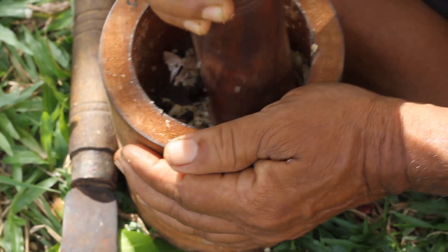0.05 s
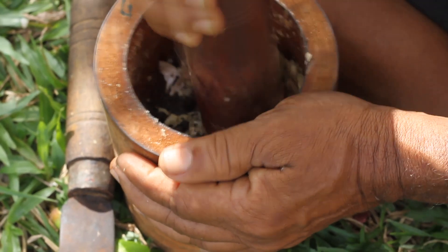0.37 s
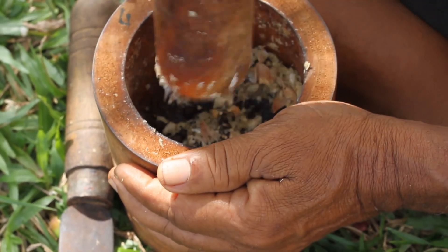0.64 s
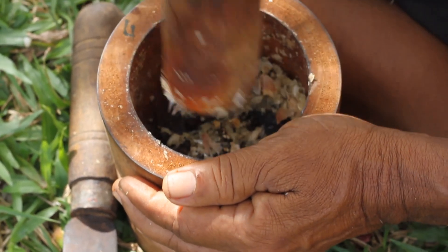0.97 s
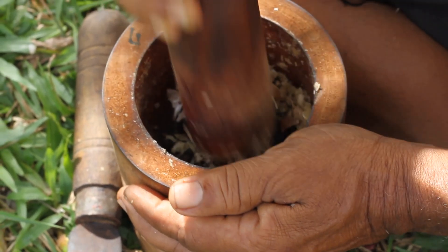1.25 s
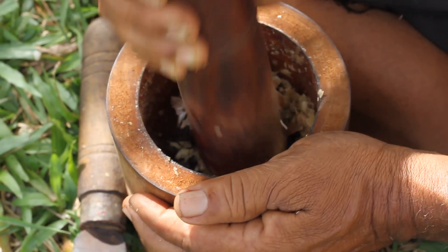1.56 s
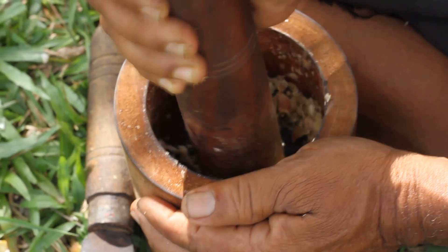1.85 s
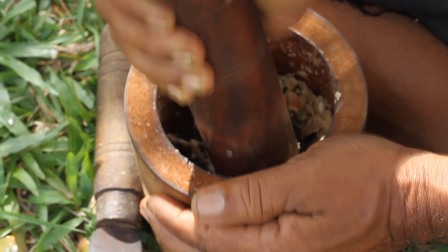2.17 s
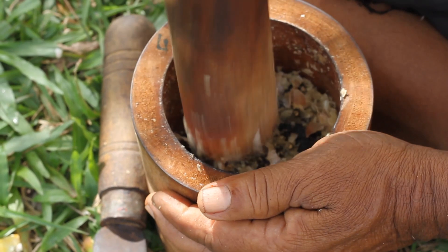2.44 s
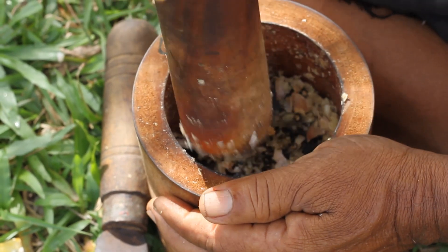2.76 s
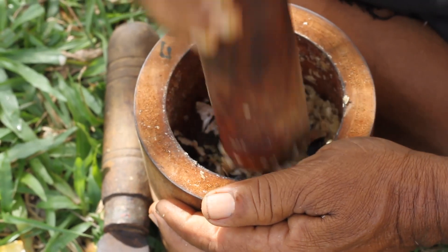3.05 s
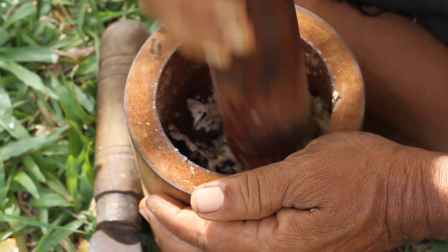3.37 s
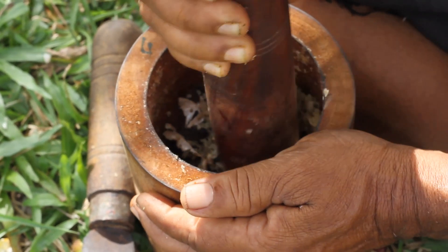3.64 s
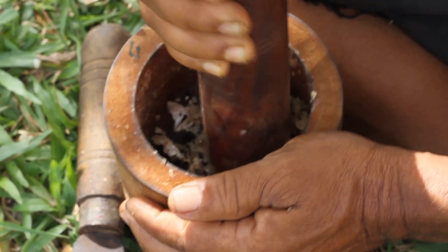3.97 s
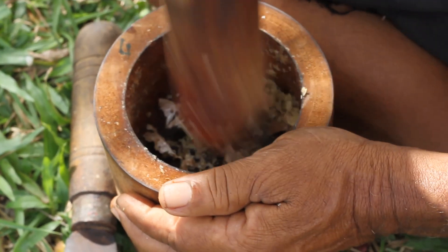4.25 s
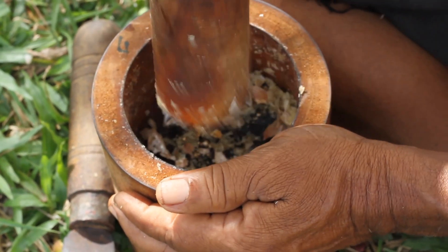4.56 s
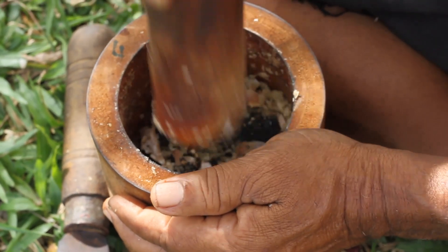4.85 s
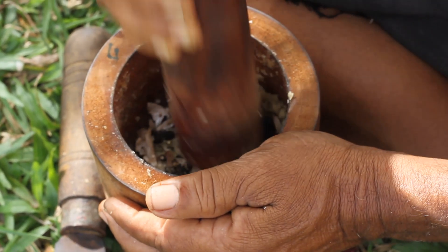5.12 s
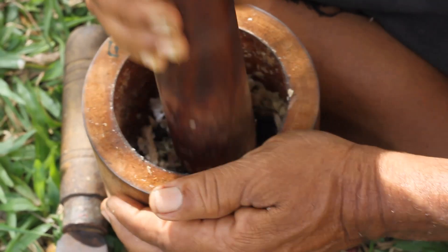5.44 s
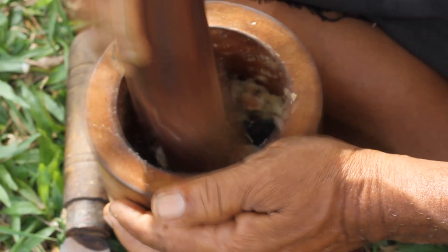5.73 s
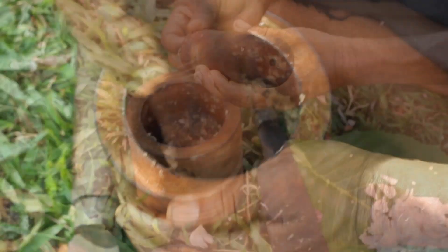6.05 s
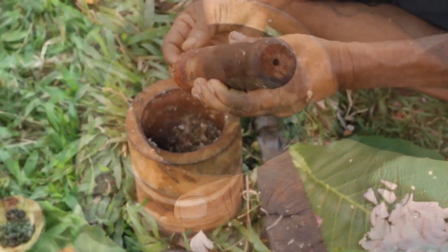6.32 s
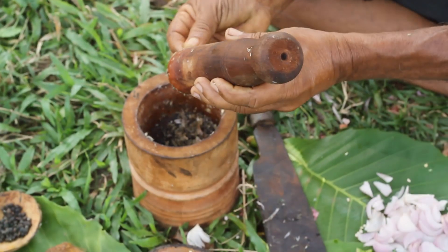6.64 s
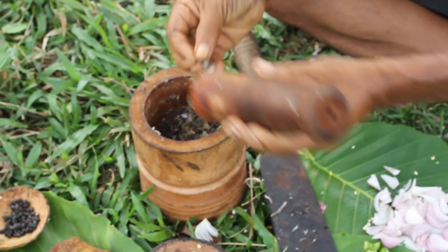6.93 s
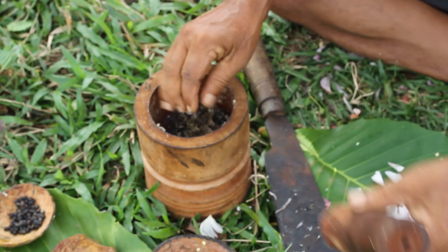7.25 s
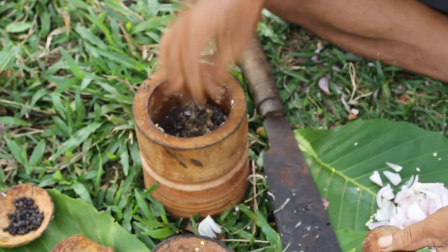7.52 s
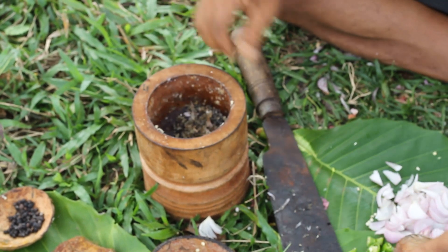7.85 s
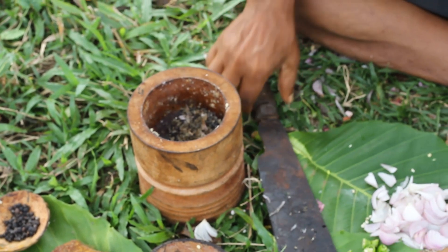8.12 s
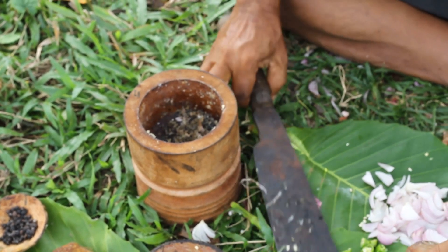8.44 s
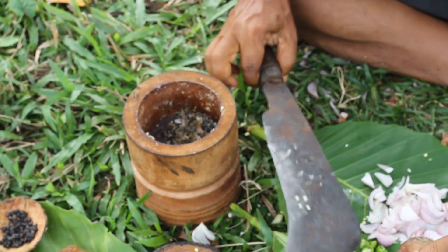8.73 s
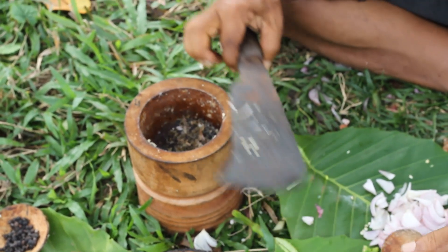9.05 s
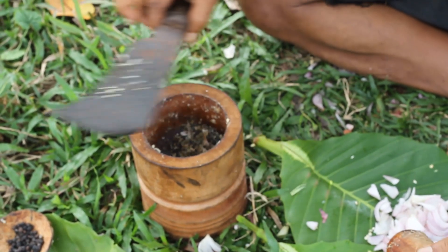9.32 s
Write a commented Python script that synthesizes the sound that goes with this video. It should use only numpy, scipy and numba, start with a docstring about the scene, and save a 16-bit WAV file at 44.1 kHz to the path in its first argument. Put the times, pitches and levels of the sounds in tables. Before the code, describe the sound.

Close, crunchy wooden knocks of a mortar and pestle outdoors fade away into soft wind on the microphone and a few birds.

```python
"""A wooden pestle pounds spices in a wooden mortar on a lawn, while birds call and wind buffets the
microphone. Blows on bare wood ring brightly; blows on the paste land dull and crunch. They overload
the microphone and duck its gain. Near six seconds the pestle clacks against the wall, and the pounding
fades away with a few faint ticks and scrapes, leaving the open air. Last, a distant rush swells."""
import sys
import numpy as np
from scipy import signal
from scipy.fft import rfft, irfft
from scipy.io import wavfile
from numba import njit

SR = 44100
rng = np.random.default_rng(int(sys.argv[2]) if len(sys.argv) > 2 else 0)


def put_to_file(sound):
    """Save the sound as 16-bit audio at rate SR, in the file named by the first command-line argument."""
    columns = np.atleast_2d(sound).T  # one column per channel
    safe = np.clip(columns, -1, 1)
    whole_steps = np.round(safe * 32767)
    wavfile.write(sys.argv[1], SR, whole_steps.astype(np.int16))


N = 418509

# pestle blows, each with a second touch on bare wood, given relative to the first:
# start_s, force_db, contact_ms, bare_db, bare_delay_ms, crunch_db
PESTLE_BLOWS = [(0.0113, 12, 0.24, -26, 0.33, -18), (0.3767, 11.5, 1, -47, 0.9, -7),
                (0.7363, 8.5, 0.17, -13, 0.16, -13), (1.094, 7, 1.02, -26, 0.51, -5.5),
                (1.4383, 5.5, 0.82, -6, 0.35, -19), (1.8158, 10.5, 1.07, -29, 0.33, -16),
                (2.162, 8.5, 0.84, -8.5, 0.34, -23.5), (2.5179, 4.5, 0.63, 7, 0.63, -26),
                (2.8645, 4, 0.61, 0, 0.36, -21.5), (3.2361, 1.5, 1.39, -42, 0.96, -11.5),
                (3.5928, 11.5, 0.13, -34, 0.081, -32), (3.9406, 16, 0.2, -15, 0.42, -38),
                (4.29, 8, 0.18, -20.5, 0.49, -17.5), (4.6451, 15, 0.24, -12.5, 0.5, -13),
                (5.0032, 17.5, 0.2, -9.5, 0.24, -29), (5.3488, 10, 0.99, -35, 0.31, -18.5),
                (5.6987, -2.5, 0.98, -13, 0.28, -17), (6.035, -14, 1.26, -18, 0.5, -28.5),
                (6.396, -15, 0.99, -14.5, 0.58, -42)]
# modes of pestle and mortar together: pitch_hz, level_db, t60_s, first_swing_sign
MORTAR_MODES = [(225, -23, 0.019, 1), (442, 0, 0.0052, -1), (558.6, 2, 0.0075, 1), (802, -8.5, 0.015, 1),
                (1059, -3, 0.015, -1), (1101, -14.5, 0.023, -1), (1489, -7, 0.014, -1),
                (1558.5, -3, 0.026, 1), (2016, -13.5, 0.022, -1), (2225, -12.5, 0.019, -1),
                (2950, -10, 0.011, 1), (3800, -9.5, 0.01, -1), (5144, -10.5, 0.015, 1)]
# the pestle strikes the wall and rebounds: start_s, level_db
WALL_CLACKS = [(5.6995, 3), (5.7092, -15)]
# modes of the wall: pitch_hz, level_db, t60_s
WALL_MODES = [(3870, -6, 0.0093), (5110, -2, 0.0041), (6000, 9.5, 0.0021), (7340, -0.5, 0.003),
              (10170, 1, 0.0024), (14000, -2, 0.0039)]
# spectrum of cracking seeds: frequency_hz, density_db
CRACK_SPECTRUM = [(100, -20), (300, -6), (800, 1), (1400, -6.5), (2400, -6), (4000, -0.5), (6300, 3.5),
                  (11000, -12), (16000, -13.5)]
# spectrum of shifting crumbs and skins: frequency_hz, density_db
CRUMB_SPECTRUM = [(100, -27), (330, -15), (700, 0.5), (2200, -1.5), (3700, 0), (6000, -6.5), (8000, -6.5),
                  (11000, -6.5), (16000, -39)]
# light ticks and scrapes, plus the brief ring and crackle of two late pestle blows:
# start_s, level_db, centre_hz, bandwidth_ratio, decay_ms
TICKS_AND_RINGS = [(.789, -34, 4400, 0.35, 1.4), (1.151, -35, 6000, 0.27, 1), (1.84, -42, 5500, 0.45, 12),
                   (2.9122, -25, 646, 0.2, 2.3), (3.259, -31, 6000, 0.37, 3.5),
                   (4.316, -35, 6500, .3, 0.97), (5.356, -17, 535, 0.3, 1.5),
                   (5.359, -38, 2500, 0.0069, 20), (5.36, -34, 850, 0.044, 17),
                   (5.71, -23.5, 8000, 0.82, 5.7), (5.964, -37, 457, 0.45, 8.1),
                   (6.032, -33, 600, 0.67, 4.2), (6.034, -27.5, 4400, 0.44, 4.1),
                   (6.06, -50, 4730, 0.27, 32), (6.126, -51, 4750, 0.25, 16), (6.38, -45, 3860, 0.2, 13),
                   (6.394, -40, 765, 0.92, 8.9), (6.708, -32.5, 3570, 0.84, 3.7),
                   (8.461, -35.5, 5040, 0.5, 1.7), (8.574, -41, 1600, 0.19, 3.7)]
# gusts on the microphone: start_s, hold_s, level_db, pitch_ratio
WIND_GUSTS = [(0.037, 0.18, -42.5, 0.84), (0.261, 0.31, -39.5, 0.87), (1.968, 0.57, -36.5, 0.96),
              (2.701, 0.053, -35, 0.98), (2.958, 0.55, -43.5, 0.84), (3.696, 0.17, -47, 0.71),
              (4.38, 0.32, -40, 0.84), (4.632, 0.14, -34.5, 1.08), (5.0, 0.31, -40.5, 0.78),
              (5.346, 0.34, -35, 1.01), (5.919, 0.5, -36.5, 1.09), (6.701, 0.24, -37, 0.79),
              (7.377, 0.04, -43.5, 0.67), (7.778, 1.53, -55.5, 0.76), (9.396, 0.1, -43, 0.64)]
# spectrum of wind on the microphone: frequency_hz, density_db
RUMBLE_SPECTRUM = [(15, -17.5), (35, -12), (70, -2.5), (130, 1), (200, -1.5), (300, -10.5), (450, -25.5),
                   (800, -33), (2000, -99)]
# thumps of the strongest eddies: centre_s, peak_db, half_width_ms
EDDY_THUMPS = [(2.3244, -23.5, 1.02), (2.3354, -21.5, 1.6), (2.753, -22, 0.92), (2.791, -20, 1.1),
               (6.114, -25.5, 0.72), (6.7274, -14.5, 0.97), (6.8128, -20.5, 1.55)]
# a far bird repeats one arched hoot: start_s, level_db
BIRD_HOOTS = [(1.577, -53), (2.181, -53.5), (6.33, -52.5), (6.88, -50.5)]
# another squeals twice: start_s, length_s, start_hz, middle_hz, end_hz, level_db, rasp_share
BIRD_SQUEALS = [(3.359, 0.2, 2240, 2344, 2240, -52.5, 0.25), (3.439, 0.093, 2330, 2085, 2120, -54.5, 1)]
# harmonics of a squeal, the second strongest: level_db
SQUEAL_HARMONICS = [-4.5, 3.5, -25]
# nearer birds chirp: start_s, length_s, start_hz, middle_hz, end_hz, level_db, rasp_share
BIRD_CHIRPS = [(0.238, 0.1, 2600, 2260, 2150, -56, 0.9), (0.62, 0.13, 2600, 2280, 2100, -61, .7),
               (1.62, 0.061, 768, 826, 775, -55, 0.43), (4.014, 0.15, 3410, 2940, 2780, -52.5, 0.26),
               (4.154, 0.07, 3260, 3415, 3380, -48, 0.2), (4.497, 0.15, 2950, 2710, 2420, -65, 0.5),
               (7.524, 0.082, 3930, 3760, 3680, -52, 0.36), (7.565, 0.11, 3400, 2510, 1850, -56, 1),
               (7.93, 0.088, 2460, 2444, 2530, -53, 0.6), (7.973, .04, 2830, 3270, 3040, -57, 1),
               (8.083, .097, 4750, 2640, 2500, -39.5, .12), (8.186, .016, 2600, 2300, 2150, -41, .1),
               (8.205, .06, 2200, 2130, 2020, -43, .4), (9.319, 0.093, 1766, 1385, 1250, -45, 0.4),
               (9.442, 0.085, 2030, 2270, 2240, -39, 0.72)]
# spectrum of outdoor air and hiss: frequency_hz, density_db
AIR_SPECTRUM = [(60, -11), (300, 3), (700, -2.5), (1500, 0.5), (2700, -1.5), (3400, -5.5), (4200, -4.5),
                (5500, -9.5), (7000, -10), (10500, -6.5), (11700, -15.5), (15700, -22), (16100, -54.5)]
# two faint hums and, in the treble, perhaps insects: centre_hz, width_hz, density_db
AIR_BANDS = [(1186, 6.8, 11), (1352, 12, 4), (7730, 610, -5), (9200, 430, 2), (10130, 450, -4)]
# growth of the distant rush: time_s, level_db
RUSH_LEVELS = [(5.8, -82.5), (6.6, -51), (7.8, -55), (8.3, -51.5), (8.8, -46.5), (9.5, -46)]
# spectrum of the rush: frequency_hz, density_db
RUSH_SPECTRUM = [(80, -12), (250, 11), (500, 1.5), (850, -2.5), (1300, -2.5), (1900, -10), (2700, -7.5),
                 (3400, -45.5), (8000, -41.5)]


def knocks(bare_ms=0.035, paste_damping=760, size=8192, lead=200):
    """Impact excites modes: paste lengthens the half-sine force, muting high modes, and damps the ring."""
    t, out = np.arange(size) / SR, np.zeros(N)
    khz = np.fft.rfftfreq(size, 1 / SR) / 1000
    omega = 2 * np.pi * khz
    modes = np.array([sign * damped_mode(t, hz, db, t60) for hz, db, t60, sign in MORTAR_MODES])
    for start, force_db, contact_ms, bare_db, delay_ms, _ in PESTLE_BLOWS:
        # the point of impact varies, which matters most to the high modes
        spot_db = rng.standard_normal(len(modes)) * np.linspace(0, 2, len(modes))
        loss_db_per_s = paste_damping * contact_ms
        ring = gain_of(spot_db) @ modes * gain_of(-loss_db_per_s * t)
        cycles = khz * contact_ms
        cushioned = (np.sinc(cycles - .5) + np.sinc(cycles + .5)) / (2 * np.sinc(.5))
        # the pestle sinks through the paste and meets the bowl a moment later
        bare = gain_of(bare_db) * np.exp(-.5 * (omega * bare_ms) ** 2 - 1j * omega * delay_ms)
        knock = np.roll(irfft(rfft(ring) * (cushioned + bare)), lead)
        add(out, start - lead / SR, gain_of(force_db) * knock)
    return out


def clacks(size=2048):
    """Free vibration: struck by the pestle, the wall rings in high, heavily damped modes."""
    t, out = np.arange(size) / SR, np.zeros(N)
    ring = sum(damped_mode(t, hz, db, t60) for hz, db, t60 in WALL_MODES)
    for start, db in WALL_CLACKS:
        add(out, start, gain_of(db) * ring)
    return out


def crunch(rise_s=0.00074, fall_s=0.00096, settle_s=0.012, crack_spread_db=4.5, crumb_spread_db=4.0):
    """Brittle fracture: seeds crack in a burst of grainy noise, then crumbs shift under the pestle."""
    size, grain_size, out = 4096, 16, np.zeros(N)
    lead = size // 12
    t = (np.arange(size) - lead) / SR
    crack_t = t - 0.000067  # the seeds give way just after the first touch
    burst = np.exp(np.minimum(crack_t / rise_s, -crack_t / fall_s))
    settling = np.exp(np.minimum(t / rise_s, -t / settle_s))
    for start, force_db, contact_ms, *_, crunch_db in PESTLE_BLOWS:
        crumbs_db = force_db - 35.5 - 3.5 * contact_ms  # a long, soft contact holds the crumbs still
        strengths = np.minimum(rng.exponential(1, (2, size // grain_size)), 4)
        grain_db = np.repeat(strengths, grain_size, axis=1) * [[crack_spread_db], [crumb_spread_db]]
        grains = rng.standard_normal((2, size)) * gain_of(grain_db)
        cracks = burst * coloured(grains[0], lambda f: spectrum(CRACK_SPECTRUM, f))
        crumbs = settling * coloured(grains[1], lambda f: spectrum(CRUMB_SPECTRUM, f))
        add(out, start - lead / SR, gain_of(crunch_db) * cracks + gain_of(crumbs_db) * crumbs)
    return out


def grit(level_db=-47, spread_db=2, decay_s=0.0013, count=3, size=512):
    """Adhesion: a few sticky crumbs let go with a tick as the pestle lifts after each blow."""
    t, out = np.arange(size) / SR, np.zeros(N)
    for start, *_ in PESTLE_BLOWS:
        for wait_s in rng.uniform(.04, .16, count):
            tick = noise(size, lambda f: spectrum(CRUMB_SPECTRUM, f)) * np.exp(-t / decay_s)
            add(out, start + wait_s, gain_of(level_db + spread_db * rng.standard_normal()) * tick)
    return out


def ticks(rise_share=0.16, size=6000):
    """Bandwidth sets the timbre of a noise transient: narrow bands ring, wide ones tick or scrape."""
    ms, out = np.arange(size) * 1000 / SR, np.zeros(N)
    for start, db, hz, width, decay_ms in TICKS_AND_RINGS:
        band = noise(size, lambda f: np.exp(-.5 * (np.log((f + 1) / hz) / width) ** 2))
        envelope = np.exp(-ms / decay_ms) * (1 - np.exp(-ms / (rise_share * decay_ms)))
        add(out, start, gain_of(db) * band * envelope)
    return out


def wind(breeze_db=-52.5, rumble_db=-1.0, lump_db=3.0, lump_hz=25):
    """Turbulent pressure on the diaphragm: breeze and gusts rumble unevenly, and single eddies thump."""
    breeze = gain_of(breeze_db) * noise(N, lambda f: spectrum(RUMBLE_SPECTRUM, f))
    rumble = gain_of(rumble_db) * (gusts() + breeze)
    out = rumble * unit_rms(gain_of(lump_db * wander(N, lump_hz)))
    ms = np.arange(-441, 442) * 1000 / SR
    for centre, db, half_width_ms in EDDY_THUMPS:
        u = ms / half_width_ms
        pulse = (1 - u ** 2) * np.exp(-u ** 2 / 2)
        add(out, centre - len(ms) / 2 / SR, gain_of(db) * pulse)
    return out


def gusts(attack_s=0.027, release_s=0.11, size=2 ** 17):
    """Bursts of turbulence rise, hold and decay, each with the rumble spectrum scaled in frequency."""
    t, out = np.arange(size) / SR, np.zeros(N)
    for start, hold_s, db, pitch_ratio in WIND_GUSTS:
        rumble = noise(size, lambda f: spectrum(RUMBLE_SPECTRUM, f / pitch_ratio))
        envelope = np.minimum(t / attack_s, 1) * np.exp(-np.maximum(t - hold_s, 0) / release_s)
        add(out, start, gain_of(db) * envelope * rumble)
    return out


def birds():
    """Scattering in the trees: far hoots and squeals carry a larger share of echo than near chirps."""
    far, near = np.zeros((2, N))
    for start, db in BIRD_HOOTS:
        add(far, start, gain_of(db) * whistle(length_s=0.19, pitches_hz=(1680, 1754, 1574), rasp=0.3))
    for start, length_s, *pitches_hz, db, rasp in BIRD_SQUEALS:
        for k, harmonic_db in enumerate(SQUEAL_HARMONICS, 1):
            add(far, start, gain_of(db + harmonic_db) * whistle(length_s, k * np.array(pitches_hz), rasp))
    for start, length_s, *pitches_hz, db, rasp in BIRD_CHIRPS:
        add(near, start, gain_of(db) * whistle(length_s, pitches_hz, rasp))
    scattered = gain_of(-10) * far + gain_of(-14) * near
    return far + near + echoes(scattered, t60_s=.5, delay_s=.01, top_hz=6000)


def whistle(length_s, pitches_hz, rasp, rasp_hz=200, waver=0.0048):
    """A tone glides through three pitches; random modulation of amplitude and phase makes it rasp."""
    size = round(length_s * SR)
    period_curve = np.polyfit([0, .5, 1], 1 / np.array(pitches_hz), 2)
    period_s = np.polyval(period_curve, np.linspace(0, 1, size))
    hz = (1 + waver * wander(size, 60)) / period_s
    flutter = 1 - rasp + rasp * (wander(size, rasp_hz) + 1j * wander(size, rasp_hz))
    note = (flutter * np.exp(2j * np.pi * np.cumsum(hz) / SR)).real
    return unit_rms(note * signal.windows.tukey(size, .5))


def air(level_db=-53.0, sway_db=1.0):
    """Incoherent sounds add in power: broad hiss and a few standing bands, swelling near the end."""
    def colour(f):
        band_power = sum(gain_of(db) ** 2 * np.exp(-((f - hz) / width) ** 2) for hz, width, db in AIR_BANDS)
        return np.sqrt(spectrum(AIR_SPECTRUM, f) ** 2 + band_power)
    hiss = noise(N, colour) * gain_of(level_db + sway_db * wander(N, 23))
    return hiss * level([(7.2, 0), (7.78, 1.5)])


def distant_rush(sway_db=0.9):
    """Amplitude-modulated noise: a low, far rush wavers and grows as the pounding fades."""
    rush = noise(N, lambda f: spectrum(RUSH_SPECTRUM, f))
    return rush * level(RUSH_LEVELS) * gain_of(sway_db * wander(N, 28))


def echoes(x, t60_s, delay_s, top_hz, size=22050):
    """Reverberation: convolution with delayed, exponentially decaying reflections of unit energy."""
    t = np.arange(size) / SR
    taps = noise(size, lambda f: 1 / np.sqrt(1 + (f / top_hz) ** 4))
    taps *= (t > delay_s) * gain_of(-60 * t / t60_s)
    return signal.fftconvolve(x, taps / np.linalg.norm(taps))[:N]


def damped_mode(t, hz, db, t60_s):
    """A damped oscillator: a sine that falls 60 dB in t60_s."""
    return gain_of(db - 60 * t / t60_s) * np.sin(2 * np.pi * hz * t)


def gain_of(db):
    """Decibels to an amplitude ratio."""
    return 10 ** (np.asarray(db) / 20)


def unit_rms(x):
    """Normalises to rms 1."""
    return x / np.sqrt(np.mean(x ** 2) + 1e-20)


def spectrum(points, hz):
    """Gain of a frequency_hz, density_db table, interpolated in log frequency."""
    f, db = np.transpose(points)
    return gain_of(np.interp(np.log(hz + 1), np.log(f + 1), db))


def level(rows):
    """Gain of a time_s, level_db curve at every sample."""
    return gain_of(np.interp(np.arange(N) / SR, *np.transpose(rows)))


def coloured(x, shape):
    """Filters x by the frequency response shape; rms 1."""
    hz = np.fft.rfftfreq(len(x), 1 / SR)
    return unit_rms(irfft(rfft(x) * shape(hz), len(x)))


def noise(size, shape):
    """Gaussian noise with the given spectral shape; rms 1."""
    return coloured(rng.standard_normal(size), shape)


def wander(size, hz):
    """Smooth random fluctuation up to about hz; rms 1."""
    return noise(size, lambda f: np.exp(-(f / hz) ** 2))


def add(mix, start_s, sound):
    """Superposes a sound on the mix at start_s."""
    part = mix[max(round(start_s * SR), 0):][:len(sound)]
    part += sound[:len(part)]


def scene():
    """Superposition of the close mortar, its faint reflections from ground and body, and the outdoors."""
    mortar = knocks() + clacks() + crunch() + grit()
    reflections = gain_of(-29) * echoes(mortar, t60_s=0.051, delay_s=0.00232, top_hz=3060)
    return (mortar + reflections + ticks() + birds() + wind() + air() + distant_rush())[None]


@njit
def ducking(level_db, threshold_db, attack_samples, release_samples):
    """Negative feedback: the gain cut grows while the output exceeds the threshold, and leaks away."""
    out, cut_db = np.zeros(len(level_db)), 0.
    for i in range(len(level_db)):
        excess_db = max(level_db[i] - cut_db - threshold_db, 0.)
        cut_db += excess_db / attack_samples - cut_db / release_samples
        out[i] = cut_db
    return out


def record(dry, threshold_db=-20., attack_s=0.013, release_s=0.17, smooth_s=0.003, ceiling_db=-11.5):
    """Saturation: the gain control is too slow for the knocks, which clip flat; a low-pass follows."""
    x, pole = dry[0], np.exp(-1 / (smooth_s * SR))
    power = signal.lfilter([1 - pole], [1, -pole], x ** 2)
    cut_db = ducking(10 * np.log10(power + 1e-12), threshold_db, attack_s * SR, release_s * SR)
    drive = x * gain_of(-cut_db - ceiling_db)
    clipped = gain_of(ceiling_db) * drive / (1 + drive ** 8) ** (1 / 8)
    low_pass = signal.firwin(255, cutoff=16300, window=("kaiser", 9), fs=SR)
    return signal.oaconvolve(clipped, low_pass, "same")[None]


dry = scene()
out = record(dry)
put_to_file(out)
```